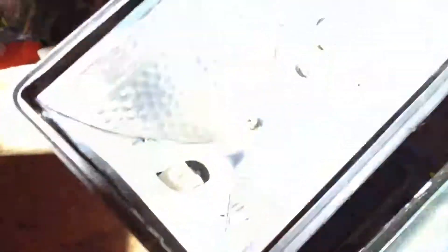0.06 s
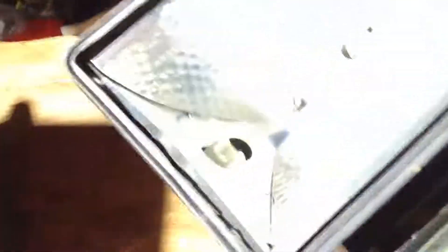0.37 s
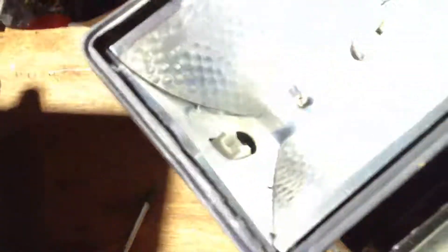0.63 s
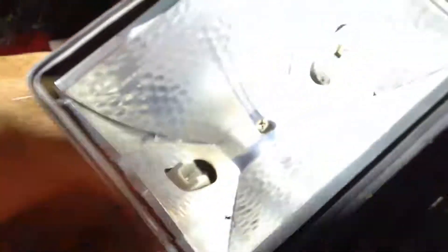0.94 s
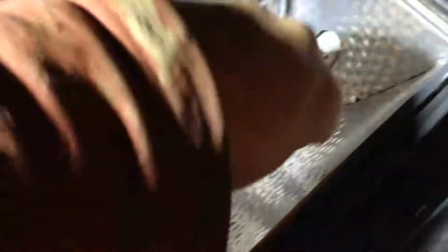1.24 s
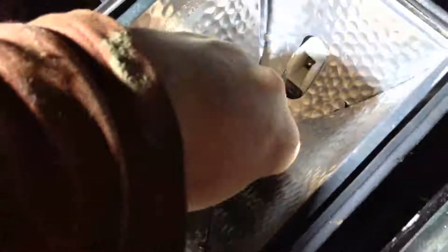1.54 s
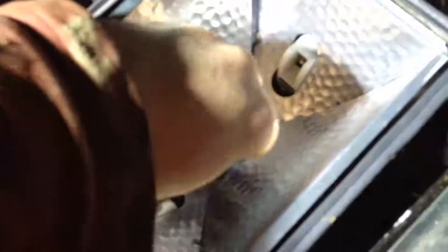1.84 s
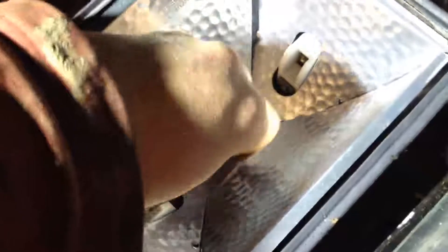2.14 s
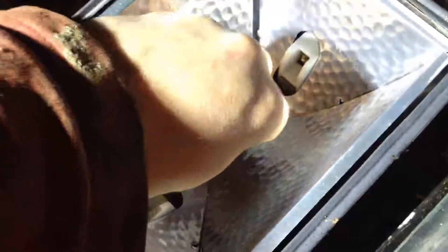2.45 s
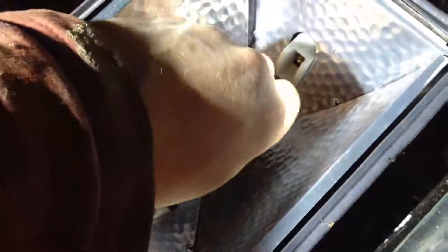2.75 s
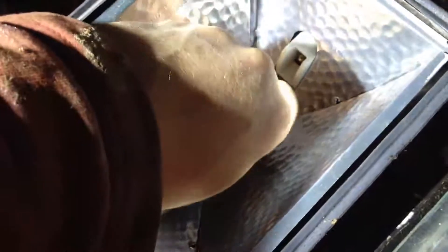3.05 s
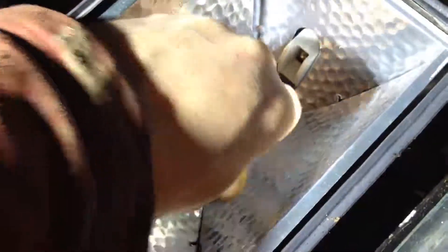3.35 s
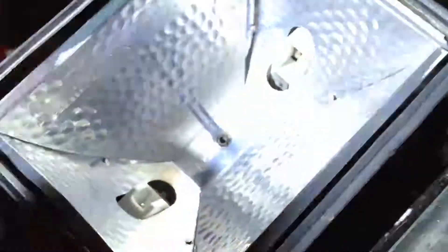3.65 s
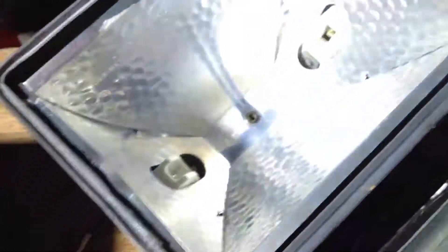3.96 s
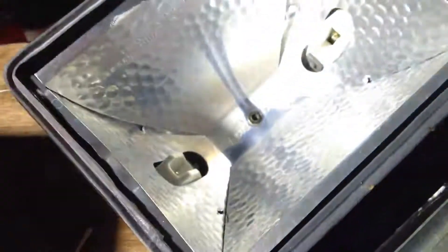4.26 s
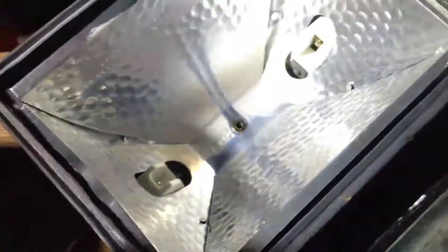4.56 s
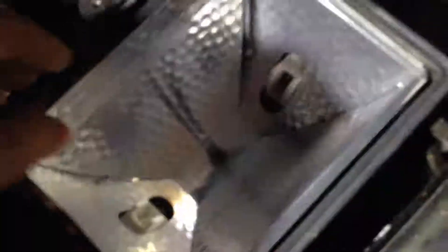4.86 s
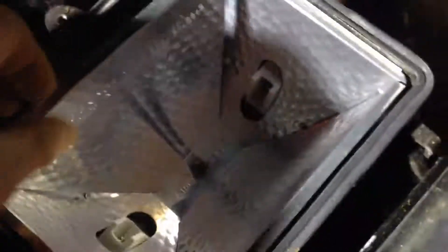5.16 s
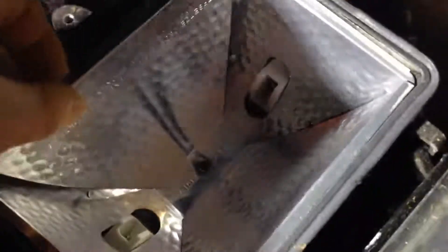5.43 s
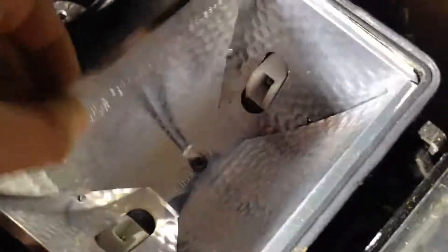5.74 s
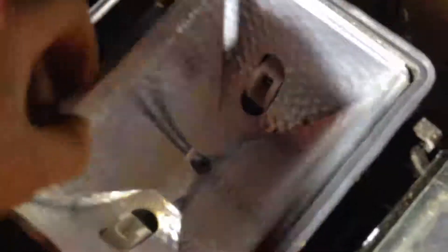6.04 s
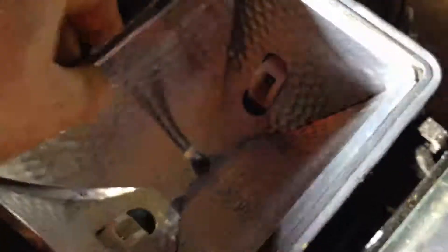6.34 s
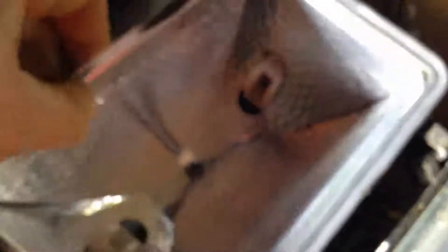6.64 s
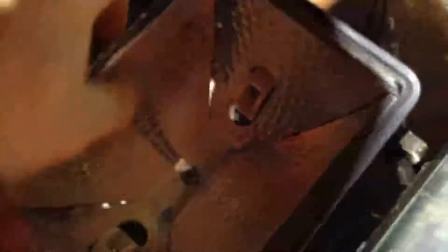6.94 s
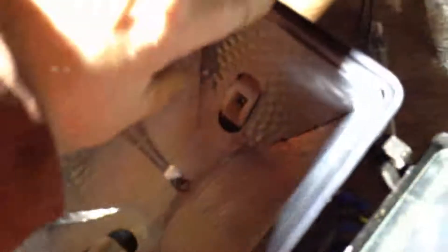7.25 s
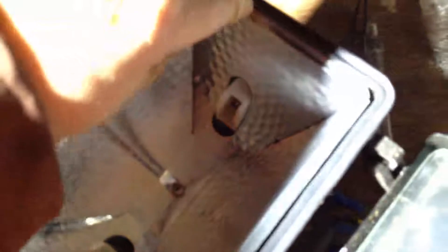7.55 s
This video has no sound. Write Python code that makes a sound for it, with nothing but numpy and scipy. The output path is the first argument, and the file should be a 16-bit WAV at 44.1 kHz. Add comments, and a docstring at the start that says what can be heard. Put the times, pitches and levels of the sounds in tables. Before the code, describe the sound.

Close up in a quiet workshop, a quick cluster of wooden thuds gives way to the soft scratching and squeaking of a screw being turned by hand. After one sharp clack and a short lull, thin sheet metal is eased out of a floodlight housing in irregular bursts of bright scrapes, ringing clicks and tiny squeals. A faint hiss and a slight room echo lie behind it.

```python
"""Taking the reflector out of a floodlight

On a workshop bench, a tool knocks down on the wood and fingers twist out a gritty, squeaking screw.
A small hard part clacks down. Then the thin aluminium reflector is worked loose: its edge scrapes,
snaps and squeals against the housing. Blows and tiny catches make the metal and the wood ring, and
friction makes the squeals. The room adds a short echo and a faint, low hiss."""
import sys
import numpy as np
from scipy import signal
from scipy.fft import rfft, irfft
from scipy.io import wavfile

SR = 44100
rng = np.random.default_rng(int(sys.argv[2]) if len(sys.argv) > 2 else 0)


def log_audio(samples):
    """Write samples as a 16-bit WAV file to the path given in sys.argv[1]."""
    # one column per channel
    frames = np.atleast_2d(samples).T
    # limit to full scale, then quantise
    limited = np.clip(frames, -1, 1)
    pcm = np.round(limited * 32767).astype(np.int16)
    wavfile.write(sys.argv[1], SR, pcm)


N = 335160
TIME = np.arange(N) / SR
ONE_SECOND = TIME[:SR]
RING_TIME = TIME[:SR // 3]   # the longest that a struck object rings


def reflector():
    """How the thin aluminium sheet rings when tapped at different spots."""
    # Its overall tone colour. Each row: frequency in Hz, relative level in dB.
    colour = [(100, -27.5), (300, -22.5), (600, -7), (1000, -7), (2000, 2), (3000, -1), (4500, 2),
              (6000, 1), (7200, -1), (9000, -11), (11500, -17), (15500, -18)]
    # Its modes, the tones it rings at. Each row: pitch in Hz, share in dB, seconds to fade by 60 dB.
    modes = [(557, -32.5, 0.32), (779, -15, 0.034), (1172, -14.5, 0.13), (1965, -11.5, .1),
             (2124, -14, 0.2), (2890, -17.5, 0.14), (2990, -15.5, 0.11), (3570, -23, 0.052),
             (3636, -11, .08), (4280, -22, 0.043), (4940, -24, 0.041), (4900, -26, 0.12),
             (5240, -13, 0.064), (5260, -25.5, 0.073), (6040, -26.5, 0.06), (6850, -20.5, 0.076),
             (7600, -19.5, .07), (8200, -16.5, 0.12), (10200, -34, 0.06), (11400, -36.5, .08),
             (12940, -21.5, 0.085)]
    return struck_body(colour, modes, wash_db=8, wash_t60=0.035, wash_hz=420, damped_hz=17170,
                       spot_db=5.5, bass_hz=198)


def sharp_clicks(sheet):
    """Sharp clicks: a small hard part clacks down, and metal catches on metal and lets go."""
    # Each row: start in seconds, level in dB, bass boost in dB, treble boost in dB.
    hits = [(1.843, -32.5, 2.5, 0.5), (3.8837, -8, 3, -16.5), (5.0478, -26, -5, 6.5),
            (5.231, -26.5, 14.5, 1), (5.716, -22, 13, -17.5), (5.964, -15, 4.5, -6.5),
            (6.019, -12.5, -10, 2), (6.519, -28, -6, -4), (6.674, -24, -24, 20), (7.321, -21, 0.5, -4),
            (7.483, -39.5, 9, -15)]
    out = np.zeros(N)
    for start, db, bass_db, treble_db in hits + screw_catches():
        force = shade(contact(chatter_t60=0.008, chatter_db=14.5), bass_db, treble_db)
        add(out, start, from_db(db) * excite(sheet, force))
    return out


def screw_catches(start_s=2.827, gap_s=0.0568, first_db=-32.5, rise_db=1, bass_db=-4.5, treble_db=1):
    """Rows for five clicks: on its last turn the screw catches at an even pace, harder each time."""
    return [(start_s + k * gap_s, first_db + k * rise_db, bass_db, treble_db) for k in range(5)]


def slips(sheet):
    """The screw or the sheet's edge slides: a rush of tiny catches swells and fades."""
    # Each row: time of the peak in seconds, level in dB, seconds to swell by the last 20 dB,
    # bass boost in dB, treble boost in dB.
    slides = [(1.475, -33.5, 0.018, 7, -6), (1.751, -36.5, 0.013, 6.5, -4), (1.982, -36.5, 0.042, 1.5, -5),
              (2.060, -42, 0.0075, -8, -14), (2.145, -39, 0.023, 6.5, -5), (2.190, -46.5, 0.022, 14.5, -6),
              (2.290, -43, 0.025, 2.5, 1), (2.550, -38.5, .038, -14, -3), (2.600, -39.5, 0.034, 0, 0.5),
              (2.712, -41.5, 0.019, 4, 8), (2.823, -39, 0.013, 3, 2), (3.061, -26.5, 0.0063, 3.5, -16),
              (3.133, -18, 0.0093, -0.5, -3), (3.379, -51.5, 0.0075, -2, -1.5),
              (5.005, -59.5, 0.0039, 18, -1), (5.050, -27.5, 0.0051, -3, -1), (5.156, -35, 0.019, 1.5, -4),
              (5.192, -34.5, 0.0057, 8.5, 3), (5.209, -32, .012, -0.5, 2), (5.312, -23.5, .022, 4.5, -0.5),
              (5.384, -23, .004, -10, -6), (5.415, -19, 0.0085, -7.5, -3.5),
              (5.555, -26, 0.0094, -4.5, -12), (5.628, -23, 0.031, -10, -8), (5.704, -19, 0.0036, 0.5, -8),
              (5.716, -13.5, .012, -4.5, -8.5), (5.749, -45, 0.0082, 12, -15.5),
              (5.918, -40, .008, 5.5, -3), (5.936, -31.5, 0.0044, 13, -3), (5.950, -30, 0.0072, 4, 11),
              (5.968, -17.5, 0.01, -1.5, -10.5), (6.009, -17, .005, -5.5, 2),
              (6.030, -19.5, 0.0069, -7.5, 14.5), (6.057, -18, .018, 1, 5), (6.112, -33.5, .03, 3.5, -1.5),
              (6.230, -40.5, .007, 6.5, 1.5), (6.323, -37.5, .012, 10.5, 2), (6.36, -25, 0.011, 3.5, -10),
              (6.383, -15.5, 0.018, -2, -9), (6.418, -43.5, 0.013, 9.5, 4), (6.448, -28.5, 0.0094, 4, -8.5),
              (6.647, -46, 0.012, 11.5, 12.5), (6.678, -19.5, 0.0034, -3.5, 11.5),
              (6.799, -26.5, .012, -5.5, -9.5), (6.821, -26.5, .008, -4.5, -1.5),
              (7.224, -53, 0.0062, -1, 6), (7.31, -29, 0.017, 2.5, 2.5), (7.328, -22.5, .011, 3.5, -4),
              (7.446, -45, 0.019, 16, 1), (7.590, -18, 0.012, -4, 0.5)]
    out, t = np.zeros(N), ONE_SECOND[:SR // 4]
    for peak, db, swell, bass_db, treble_db in slides:
        start = peak - 2 * swell
        fade = 0.024 + 0.48 * swell   # a slip that builds slowly also dies slowly
        since_peak = start + t - peak
        drop_db = 20 * np.where(since_peak < 0, (since_peak / swell) ** 2, since_peak / fade)
        force = from_db(db - drop_db) * grit(len(t), per_s=5000, spread_db=5.5)
        add(out, start, excite(sheet, shade(force, bass_db, treble_db)))
    return out


def squeals(waver_hz=250, flutter_db=3, overtone_db=-17.5, onset_s=0.0054, ring_s=0.0056):
    """Metal sticks and slips in step with one of its modes: an unsteady tone with weak overtones."""
    # Each row: start in seconds, length in seconds, pitch in Hz, level in dB.
    squeaks = [(1.744, 0.0068, 2180, -35.5), (1.745, .009, 5130, -38.5), (2.71, 0.021, 3990, -33.5),
               (2.726, 0.021, 3890, -25.5), (2.772, 0.011, 3886, -30.5), (3.126, 0.016, 1233, -31.5),
               (5.416, 0.0067, 5440, -25.5), (5.552, 0.1, 2028, -44.5), (5.606, 0.026, 3595, -31),
               (5.706, .005, 4700, -15.5), (5.708, 0.0092, 2680, -16.5), (5.715, 0.037, 795, -36),
               (5.949, 0.08, 2030, -39), (6.013, 0.017, 1927, -26.5), (6.015, 0.018, 4914, -15),
               (6.033, 0.03, 4970, -18), (6.096, .032, 4840, -37.5), (6.145, .13, 5000, -56.5),
               (6.374, 0.0065, 2645, -20.5), (6.674, 0.0054, 5700, -12.5), (6.676, .034, 2540, -29),
               (7.581, .022, 2930, -25)]
    out, t = np.zeros(N), ONE_SECOND[:SR // 4]
    for start, length, hz, db in squeaks:
        pitch = hz * (1 + 0.009 * waver(len(t), waver_hz))
        level = from_db(db + flutter_db * waver(len(t), waver_hz))
        phase = 2 * np.pi * np.cumsum(pitch) / SR
        overtones = np.sin(2 * phase) + np.sin(3 * phase) / 4
        tone = np.sin(phase) + from_db(overtone_db) * overtones
        envelope = (1 - np.exp(-t / onset_s)) * np.exp(-np.maximum(t - length, 0) / ring_s)
        add(out, start, np.sqrt(2) * level * envelope * tone)
    return out


def rubbing(sheet, attack_s=0.022, release_t60=0.25, waver_db=2):
    """Fingers press, slide and let go: a light, sandy sound that wanders over screw and sheet."""
    # Each row: start in seconds, length in seconds, level in dB.
    strokes = [(0.043, 1.12, -64), (1.46, 0.059, -46.5), (1.55, 0.49, -55), (1.863, 0.11, -51.5),
               (2.086, 0.37, -53.5), (2.49, 0.13, -45.5), (2.649, 0.18, -52), (2.853, 0.32, -45.5),
               (3.697, 0.35, -57.5), (4.121, 0.072, -64), (4.697, 0.64, -67.5), (5.187, 0.11, -42),
               (5.35, 0.93, -64), (6.115, 0.35, -52.5), (6.546, 0.14, -53), (6.705, 0.082, -43.5),
               (6.857, 0.053, -50.5), (7.15, .07, -63.5), (7.443, 0.077, -58.5), (7.549, .03, -44)]
    pressure = np.zeros(N)
    for start, length, db in strokes:
        press = np.clip((TIME - start) / attack_s, 0, 1)
        release = dying(release_t60, np.maximum(TIME - start - length, 0))
        pressure += from_db(db) * press * release
    pressure *= from_db(waver_db * waver(N, hz=10))   # fingers never press quite evenly
    force = pressure * shade(grit(N, per_s=1100, spread_db=3.5), bass_db=5.5, treble_db=1.5)
    out, step = np.zeros(N), SR // 10
    for i in range(0, N, step):   # pick a spot every tenth of a second
        add(out, i / SR, excite(sheet, force[i:i + step]))
    return out


def cupped_air(metal, band_hz=(590, 790)):
    """Air trapped between the hand and the reflector's bowl rings along with the metal."""
    # How closely the hand covers the bowl. Each row: time in seconds, level of the ringing air in dB.
    cover = [(1.2, -28), (1.5, 0.5), (2.0, 1), (2.2, -5.5), (2.6, 5.5), (2.8, -41), (3.3, -16.5)]
    return gain_curve(cover) * cut(metal, band_hz, "band", order=1)


def workbench():
    """How the wooden bench rings when tapped at different spots."""
    # Its overall tone colour. Each row: frequency in Hz, relative level in dB.
    colour = [(30, -38), (70, -16), (130, -8.5), (220, 9), (450, -8.5), (800, -2.5), (1600, -4), (3000, 3),
              (6000, 2.5), (15000, -39)]
    # The tones it rings at. Each row: pitch in Hz, share in dB, seconds to fade by 60 dB.
    modes = [(197, -19, 0.046), (243.8, -5, 0.16), (328, -10.5, 0.039), (443, -5, 0.11),
             (593, -13.5, 0.046), (703, -17.5, 0.036), (1050, -22, 0.073), (1567, -16, 0.054)]
    return struck_body(colour, modes, wash_db=5.5, wash_t60=0.058, wash_hz=400, damped_hz=3220,
                       spot_db=9, bass_hz=143)


def knocks(bench):
    """Things land on the bench: a soft contact gives a thud and only a faint, high tick."""
    # Each row: start in seconds, relative level in dB, top of the thud in Hz, share of the tick in dB.
    blows = [(0.164, -41.5, 1540, -36), (0.5315, -20, 2200, -9), (0.535, -22, 1700, -35),
             (0.561, -23.5, 2030, -11), (0.577, -28, 2000, -27), (0.599, -29, 900, -21),
             (0.688, -13.5, 870, -26.5), (0.696, -15.5, 523, -55), (0.754, -24.5, 454, -28),
             (0.765, -31, 500, -49), (0.789, -24.5, 590, -19.5), (0.965, -40, 1050, -31),
             (1.126, -51, 2500, -19), (3.806, -30.5, 695, -9), (3.886, -33.5, 1064, -26),
             (3.908, -26, 730, -36), (4.1, -39, 2230, -39), (4.280, -52.5, 3540, -29)]
    out = np.zeros(N)
    for start, db, soft_hz, tick_db in blows:
        blow = contact(chatter_t60=0.0036, chatter_db=-2.5)
        thud = cut(blow, soft_hz, "low")
        tick = from_db(tick_db) * cut(blow, 2700, "high", order=1)
        add(out, start, from_db(db + 8) * excite(bench, thud + tick))
    return out


def hollow_rings(band_ratio=1.25):
    """A brief, hollow ring as the tool lands on the bench, and lighter hand bumps on the housing."""
    # Each row: start in seconds, relative level in dB, pitch in Hz.
    touches = [(0.532, -11, 467), (0.533, -14, 1430), (0.696, -10.5, 475), (3.776, -37, 545),
               (3.805, -23.5, 424), (3.866, -32.5, 397), (3.890, -28.5, 555), (3.907, -29, 405),
               (4.883, -39.5, 767), (4.925, -37, 787), (6.968, -37.5, 780), (7.122, -46.5, 547)]
    out = np.zeros(N)
    for start, db, hz in touches + fumbles():
        blow = contact(chatter_t60=0.053, chatter_db=4)
        ring = unit(cut(blow, [hz / band_ratio, hz * band_ratio], "band"))
        add(out, start, from_db(db + 18.5) * ring)
    return out


def fumbles(per_s=15, db=-44.5, spread_db=7.5, hz=580, spread_octaves=0.6):
    """Rows for light, uneven bumps while the hand feels about on the housing."""
    # Each row: start in seconds, end in seconds.
    spells = [(0.05, 0.25), (0.93, 1.12), (3.56, 3.8), (4.14, 4.22)]
    rows = []
    for start, end in spells:
        for beat in np.arange(start, end, 1 / per_s):
            late, size, pitch = 1 - 2 * rng.random(3)   # each between -1 and 1
            rows.append((beat + 0.5 * late / per_s, db + spread_db * size,
                         hz * 2 ** (spread_octaves * pitch)))
    return rows


def room_echo(build_s=0.0036, dull_hz=7000):
    """The workshop's echo of one click: it builds up quickly, and its highest treble dies first."""
    # Each row: frequency in Hz, seconds to fade by 60 dB.
    fade_times = [(150, 0.31), (500, 0.61), (2000, 0.65), (5000, 0.63), (8000, 0.3), (15000, 0.19)]
    edges = np.geomspace(60, 16000, 9)
    tail = np.zeros(SR)
    for low, high in zip(edges, edges[1:]):
        band = cut(rng.standard_normal(SR), [low, high], "band")
        tail += band * dying(at_hz(fade_times, np.sqrt(low * high)), ONE_SECOND)
    build_up = 1 - np.exp(-ONE_SECOND / build_s)
    return unit(cut(tail, dull_hz, "low", order=1) * build_up)


def room_tone():
    """The faint, low hiss of the workshop, slowly rising and falling."""
    # Each row: frequency in Hz, relative level in dB.
    colour = [(18, -54), (30, -44.5), (48, -35.5), (56, -14), (70, -24), (93, -6), (109, -10), (165, 3),
              (415, -4.5), (1010, -7.5), (2410, -17), (6720, -22), (9970, -35.5), (16000, -29.5)]
    # Each row: time in seconds, level in dB.
    levels = [(0, -55.5), (1.2, -57), (2.5, -59), (3.5, -57), (4.4, -64), (5.5, -57), (7.6, -59.5)]
    return gain_curve(levels) * through(rng.standard_normal(N), pulse(colour))


def struck_body(colour, modes, wash_db, wash_t60, wash_hz, damped_hz, spot_db, bass_hz):
    """A tap at each of 16 spots on an object: a crack, a wash of crowded modes and a few clear ones."""
    t = RING_TIME
    crack = pulse(colour)[:len(t)]
    rings = np.array([from_db(db) * unit(np.cos(2 * np.pi * hz * t) * dying(t60, t))
                      for hz, db, t60 in modes])
    spots = []
    for _ in range(16):
        crowd = cut(rng.standard_normal(len(t)), wash_hz, "high")   # modes only crowd above this pitch
        crowd = cut(crowd, damped_hz, "low")   # the highest are too damped to ring
        wash = unit(through(crowd * dying(wash_t60, t), crack))
        shares = from_db(spot_db * (1 - 2 * rng.random(len(modes))))   # each spot favours other modes
        response = crack + from_db(wash_db) * wash + shares @ rings
        spots.append(unit(cut(response, bass_hz, "high", order=3)))   # a small body gives little bass
    return spots


def excite(spots, force):
    """The sound of a force acting on one spot, picked at random."""
    return signal.fftconvolve(force, spots[rng.integers(len(spots))])


def contact(chatter_t60, chatter_db):
    """The force of one blow: a first touch and a brief chatter."""
    t = RING_TIME[:SR // 10]
    force = from_db(chatter_db) * unit(rng.standard_normal(len(t)) * dying(chatter_t60, t))
    force[0] += 1
    return unit(force) * np.sqrt(0.004 * SR)   # as much energy as 4 ms at level 1


def grit(count, per_s, spread_db):
    """Tiny catches of uneven size at random moments, with an average power of 1."""
    sizes = from_db(spread_db * np.clip(rng.standard_normal(count), -2, 2))
    signs = rng.choice([-1, 1], count)
    caught = rng.random(count) < per_s / SR
    return unit(sizes * signs * caught) * np.sqrt(count)


def shade(force, bass_db, treble_db):
    """Set a force's bass and treble: a broad contact drives low modes, a sharp edge high ones."""
    low, rest = split(force, hz=2200)
    low, high = split(from_db(bass_db) * low + rest, hz=7500)
    return low + from_db(treble_db) * high


def waver(count, hz):
    """A random wobble, mostly slower than hz, with an average power of 1."""
    return unit(cut(rng.standard_normal(count), hz, "low")) * np.sqrt(count)


def pulse(colour):
    """The shortest click that has this tone colour, with an energy of 1."""
    gains = from_db(at_hz(colour, np.fft.rfftfreq(SR, 1 / SR)))
    cepstrum = irfft(np.log(gains))
    # Folding the second half onto the first packs the energy at the start of the click.
    cepstrum[1:SR // 2] *= 2
    cepstrum[SR // 2 + 1:] = 0
    return unit(irfft(np.exp(rfft(cepstrum))))


def from_db(db):
    """Turn decibels into a gain to multiply by."""
    return 10 ** (np.asarray(db) / 20)


def at_hz(rows, hz):
    """Look up a frequency in a table, sliding between its rows on a scale of octaves."""
    freqs, values = np.transpose(rows)
    return np.interp(np.log(np.maximum(hz, 1)), np.log(freqs), values)


def gain_curve(rows):
    """A gain for every sample, from rows of seconds and dB."""
    return from_db(np.interp(TIME, *np.transpose(rows)))


def unit(x):
    """Scale to an energy of 1."""
    return x / np.sqrt(np.sum(x ** 2) + 1e-20)


def dying(t60, t):
    """A fade that loses 60 dB in t60 seconds."""
    return np.exp(-np.log(1000) * np.minimum(t / t60, 10))


def cut(x, hz, kind, order=2):
    """Filter a sound, keeping the "low" part, the "high" part or a "band"."""
    return signal.sosfilt(signal.butter(order, hz, kind, fs=SR, output="sos"), x)


def split(x, hz):
    """The parts of a sound below and above a frequency."""
    return [cut(cut(x, hz, kind), hz, kind) for kind in ("low", "high")]


def through(x, response):
    """Give a sound the ring or echo of a response, keeping its length."""
    return signal.fftconvolve(x, response)[:len(x)]


def add(track, start_s, sound):
    """Mix a sound into the track at the given time."""
    start = max(round(start_s * SR), 0)
    track[start:start + len(sound)] += sound[:max(N - start, 0)]


def scene():
    """Reflector, housing and bench close by, with the room behind them."""
    sheet, bench = reflector(), workbench()
    metal = sharp_clicks(sheet) + slips(sheet) + rubbing(sheet) + squeals()
    metal = metal + cupped_air(metal)
    thuds = knocks(bench) + hollow_rings()
    echo = through(from_db(-23) * metal + from_db(-14.5) * thuds, room_echo())
    return (metal + thuds + echo + room_tone())[None]


def record(dry):
    """A steep filter removes the treble above 16200 Hz."""
    return signal.sosfilt(signal.ellip(10, 0.3, 80, 16200, fs=SR, output="sos"), dry)


dry = scene()
out = record(dry)
log_audio(out)
```